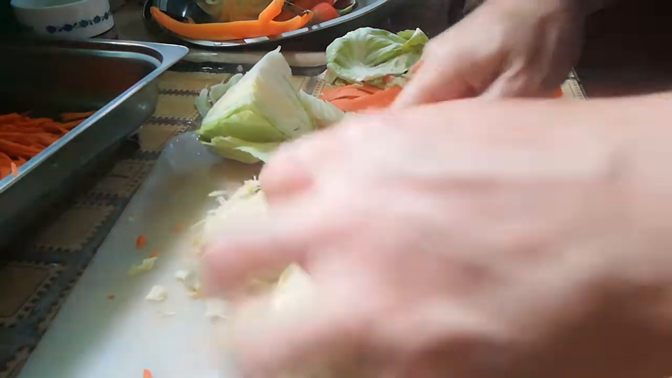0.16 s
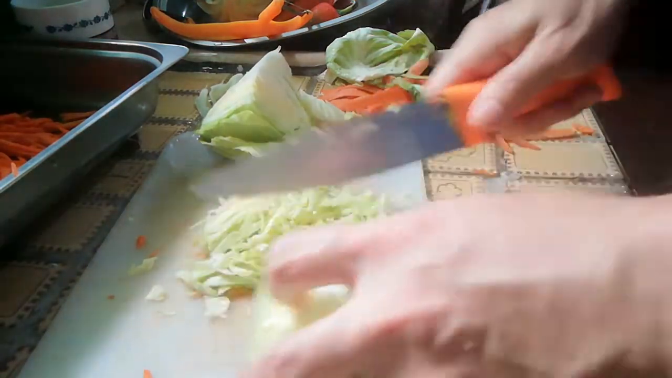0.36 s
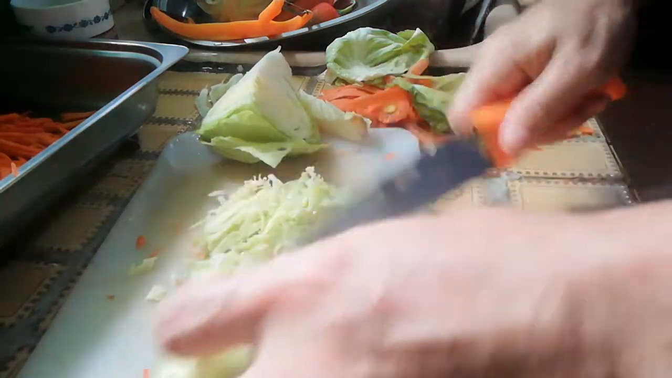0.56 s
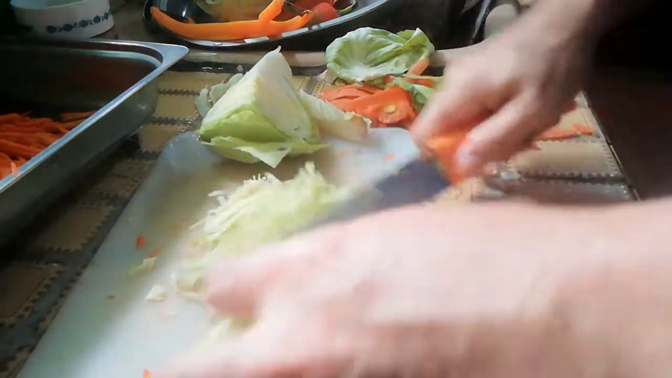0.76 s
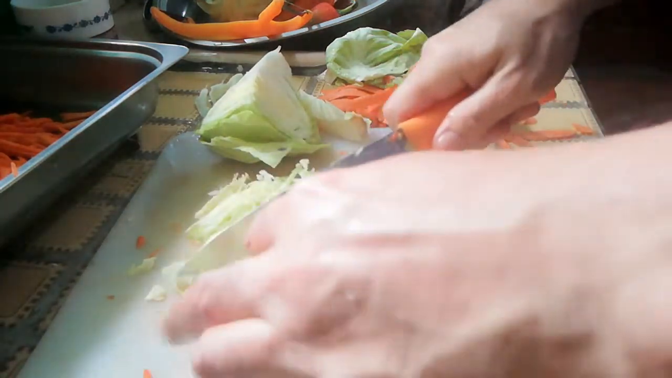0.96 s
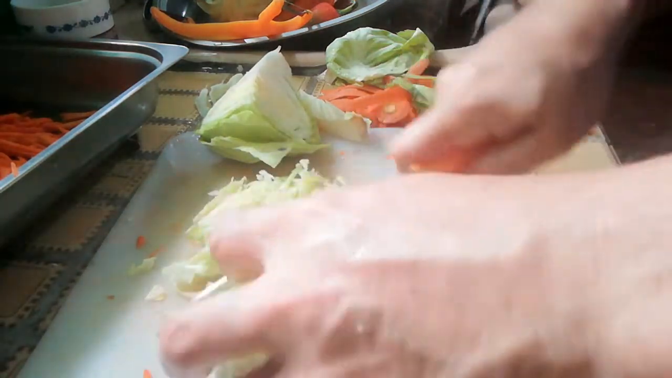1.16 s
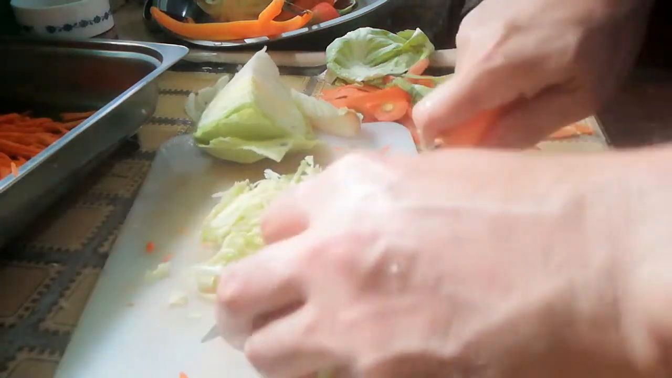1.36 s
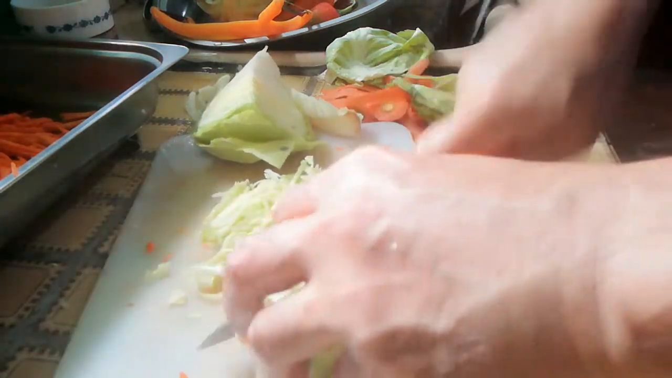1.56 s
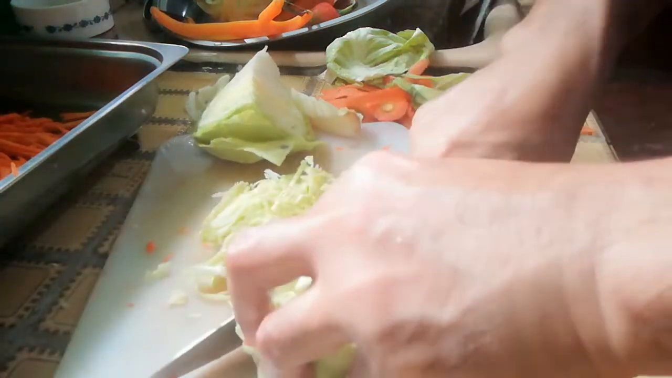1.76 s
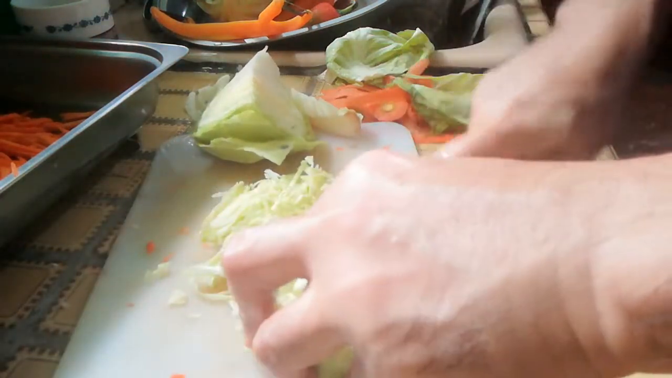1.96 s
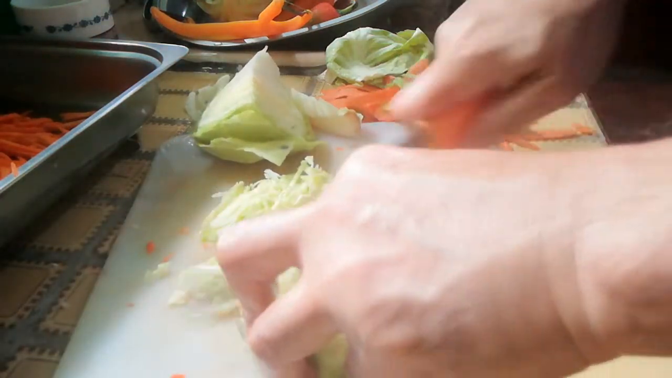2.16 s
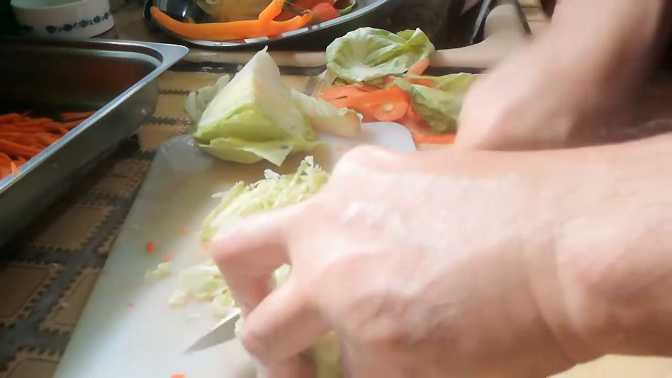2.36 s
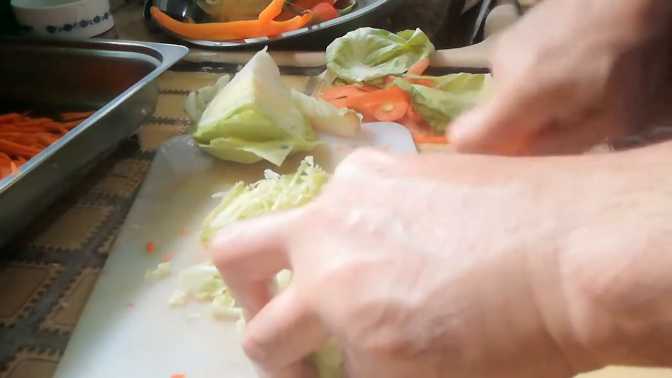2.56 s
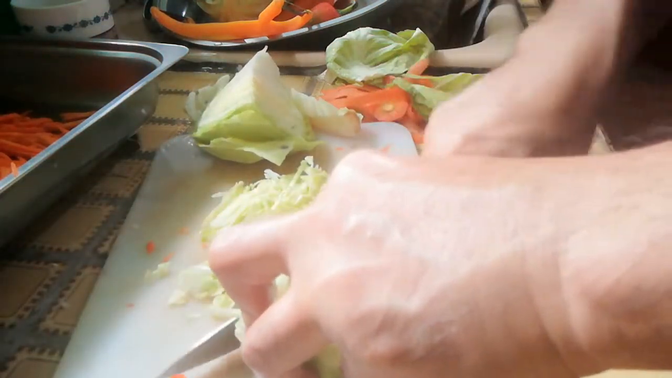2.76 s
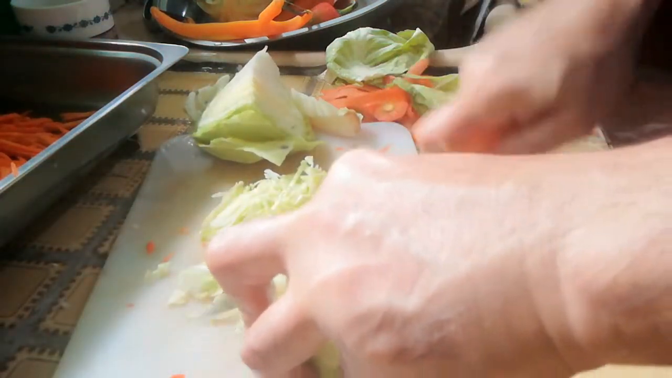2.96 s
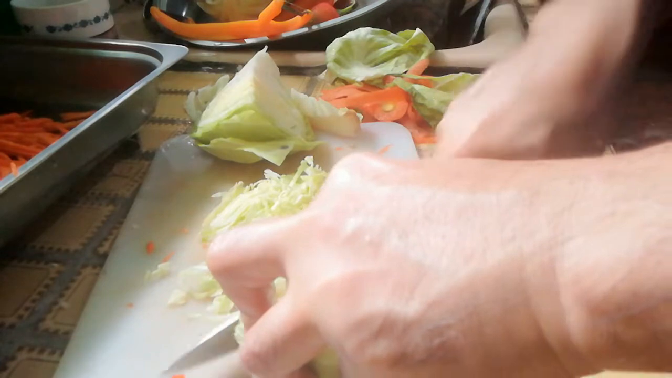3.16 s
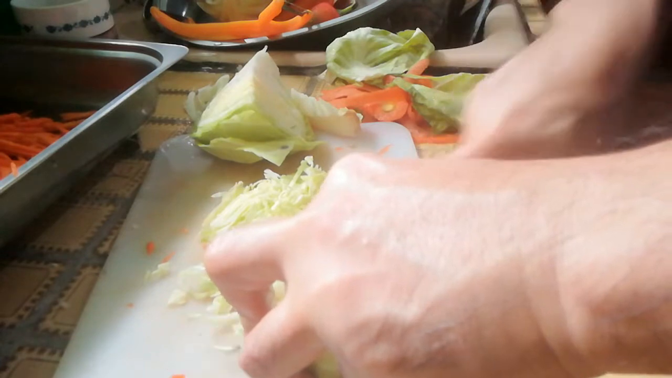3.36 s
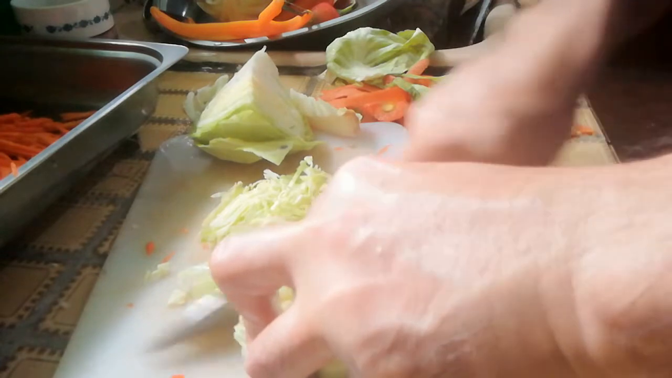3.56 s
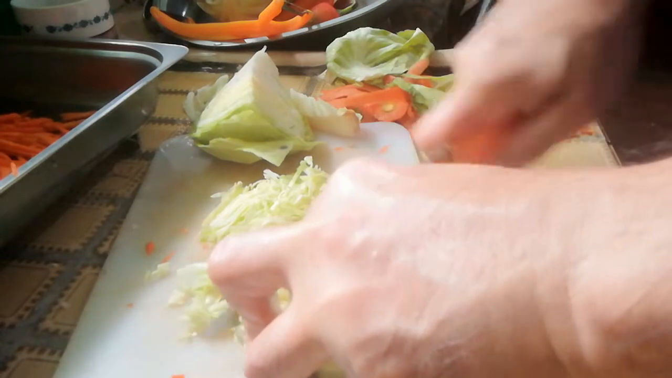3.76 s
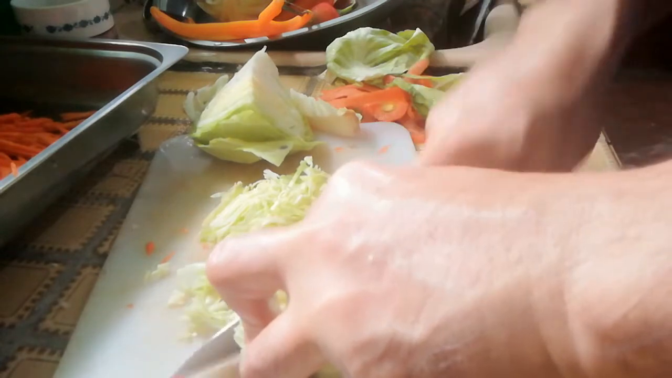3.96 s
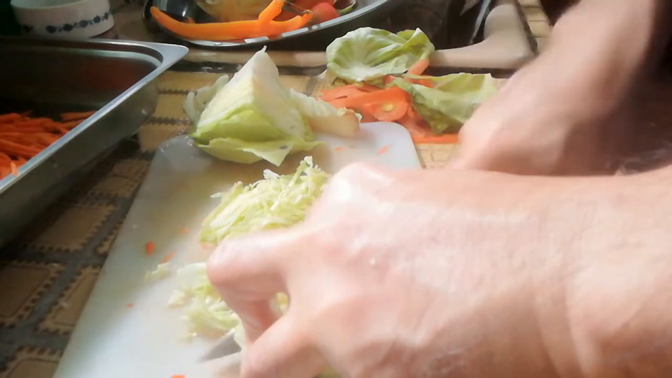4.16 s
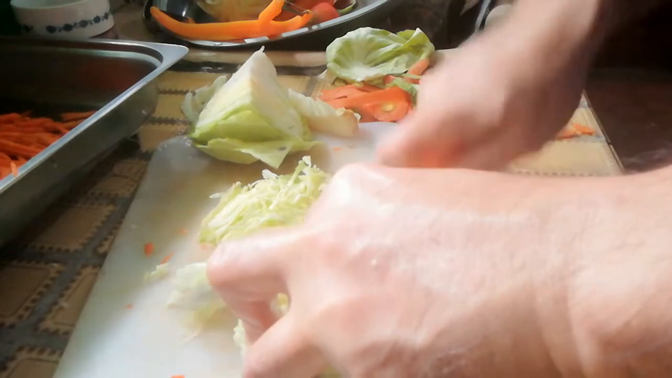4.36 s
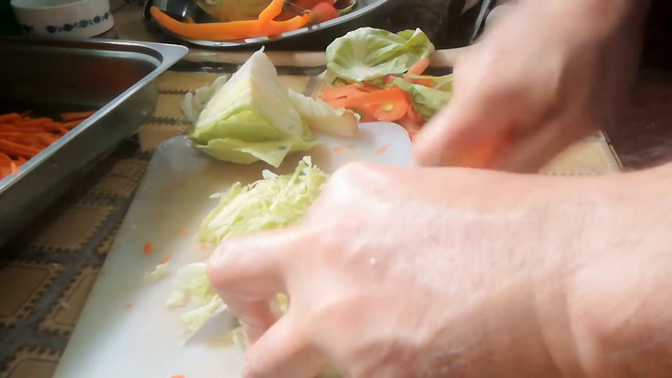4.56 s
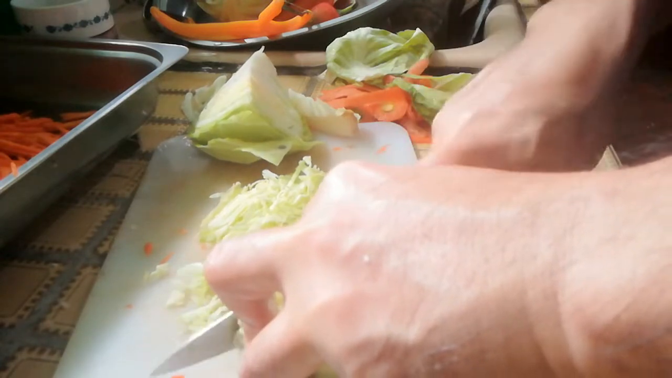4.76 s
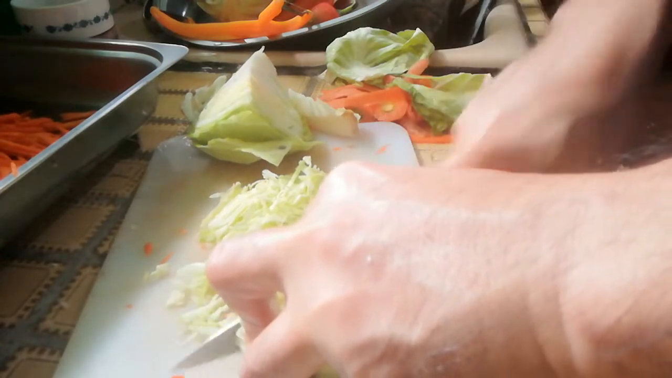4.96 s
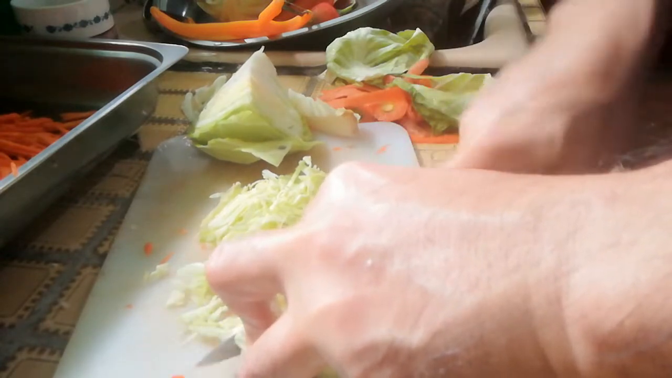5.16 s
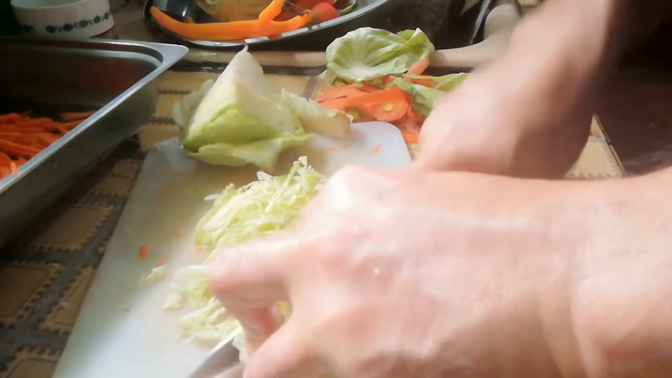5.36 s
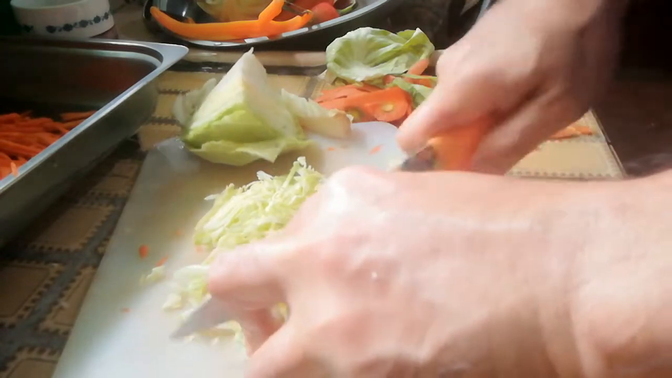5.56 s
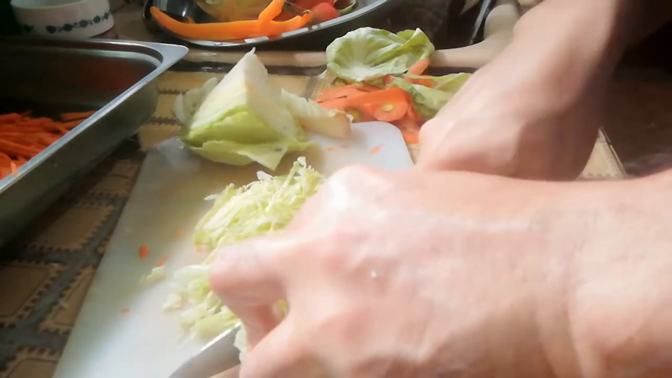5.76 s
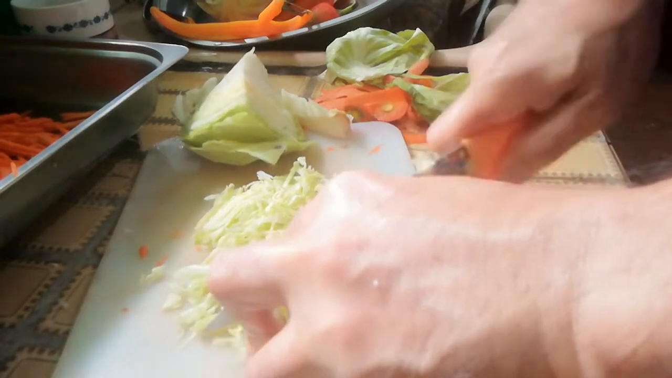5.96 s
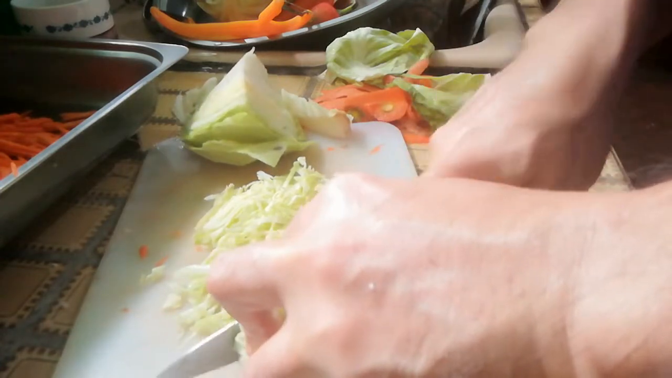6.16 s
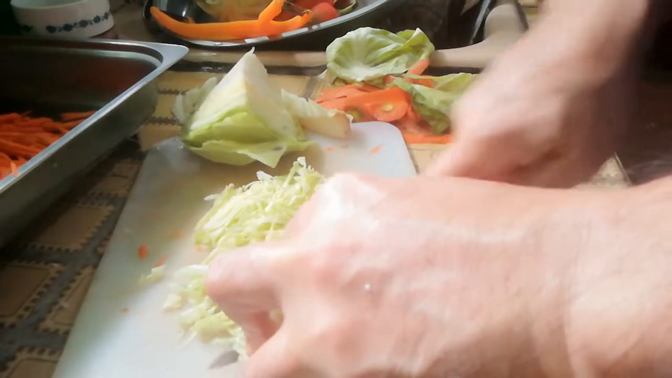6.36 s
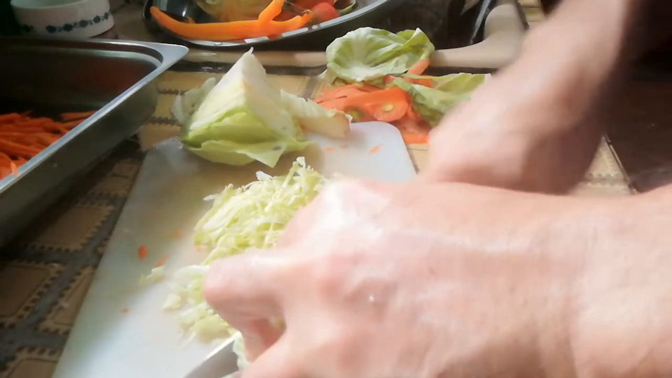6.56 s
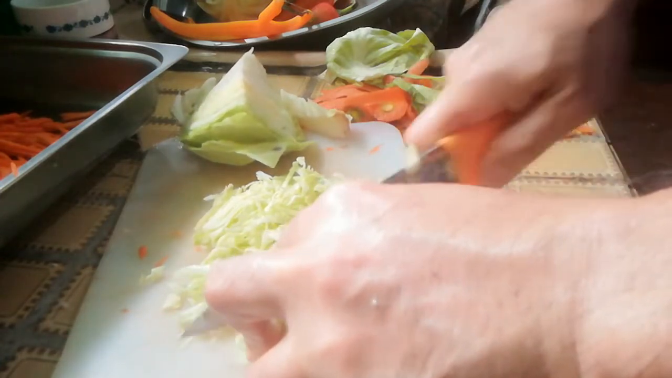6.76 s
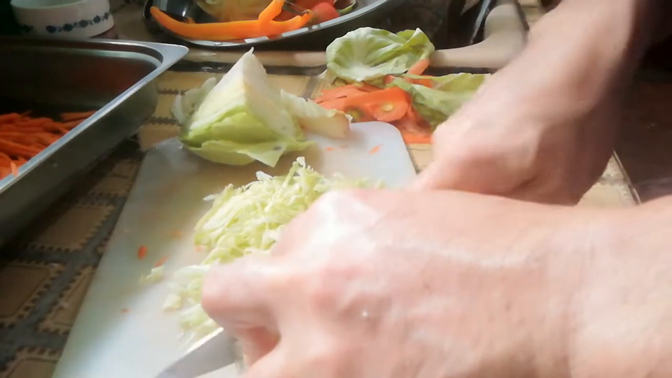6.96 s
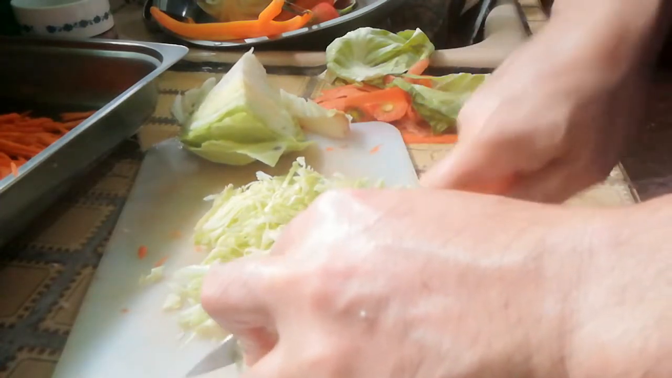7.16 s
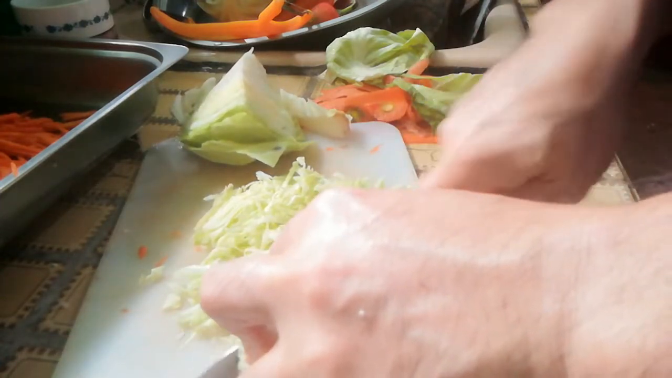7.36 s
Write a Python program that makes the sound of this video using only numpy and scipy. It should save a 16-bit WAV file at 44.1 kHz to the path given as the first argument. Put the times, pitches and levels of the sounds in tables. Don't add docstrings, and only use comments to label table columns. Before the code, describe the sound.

Close kitchen sound of cabbage being shredded: light leafy rustles, then quick crunchy cuts, bright snapping fibres and blade knocks above a quiet low hum.

```python
import sys
import numpy as np
from scipy import signal
from scipy.fft import rfft, irfft, next_fast_len
from scipy.io import wavfile
from scipy.ndimage import uniform_filter1d, map_coordinates

SR = 44100
rng = np.random.default_rng(int(sys.argv[2]) if len(sys.argv) > 2 else 0)


def gain_from_db(level_db):
    decades = np.asarray(level_db, float) / 20
    return 10 ** decades


def file_out(sig):
    cols = np.atleast_2d(sig).T
    lim = np.clip(cols, -1, 1)
    pcm = np.round(lim * 32767).astype(np.int16)
    wavfile.write(sys.argv[1], SR, pcm)


N = 326781

# (frequency [Hz], density [dB per Hz])
AIR_COLOUR = [(13, -38), (22, -12.5), (70, -4.5), (122, -9.5), (165, -7.5), (270, -9), (420, -15.5),
              (554, -9), (618, -17.5), (988, -10.5), (2520, -27), (7810, -22.5), (16000, -51)]
# (frequency [Hz], likeness [-1 to 1])
CAPSULE_LIKENESS = [(60, 0.91), (200, 0.9), (380, -0.16), (550, -0.4), (750, 0.26), (1100, -0.036),
                    (8000, -0.16)]
# (frequency [Hz], peak level [dB])
HUM_LINES = [(59.2, -77.5), (118.4, -65.5)]
# (time [s], level [dB])
PAN_RINGS = [
    (2.188, -59),
    (2.245, -64.5),
]

# (time [s], length [s], crisp level [dB], # crunch above
# crisp [dB])
RUSTLES = [(.315, 0.084, -55.5, -9.5), (0.587, 0.089, -61, -2), (0.676, 0.2, -56.5, -8),
           (0.941, 0.15, -61, -8), (1.099, 0.21, -56, -7.5), (1.27, 0.18, -54.5, -5.5),
           (1.469, 0.043, -45, -6.5), (1.69, 0.1, -53, -9.5), (1.788, .05, -54.5, -3),
           (1.846, 0.075, -52, -4), (2.055, 0.034, -46.5, -11), (2.15, 0.21, -61.5, -7.5),
           (2.488, .05, -56.5, -5.5), (2.58, 0.042, -47.5, -3), (2.789, 0.077, -54.5, -3.5),
           (3.023, 0.055, -62.5, -12), (3.259, 0.15, -49, -5.5), (3.468, 0.1, -55, -1),
           (3.71, 0.023, -62, -24), (3.758, .035, -53, -13), (3.984, 0.046, -53, -5),
           (4.219, 0.053, -58.5, -1), (4.483, 0.13, -63, -7), (4.799, 0.048, -54, -7.5),
           (5.13, 0.09, -53.5, -13), (5.28, 0.23, -53, -4.5), (6.022, 0.033, -54, -9), (6.36, .04, -65, -5),
           (6.527, 0.16, -51.5, -6), (6.83, 0.067, -54, -1),
           (2.74, 0.018, -53, -7),
    (5.625, .04, -60.5, -3),
    (5.8, 0.12, -62, 6),
    (7.1, 0.037, -73.5, 13),
    (7.3, 0.17, -59, -18),
    (6.79, 0.018, -67.5, 0),
    (5.59, 0.016, -70, -11),
    (2.5, 0.017, -50.5, -3.5),
]
# (time [s], length [s], crest position [share 0-1], crisp level [dB],
# crunch above crisp [dB])
SLICES = [(1.53, .11, 0.56, -37.5, -3), (2.3, 0.091, 0.4, -39, -5.5), (3.074, 0.13, 0.4, -37, -6.5),
          (3.794, 0.081, 0.66, -36, -7.5), (4.557, 0.19, .3, -41.5, -9.5), (4.935, 0.085, .55, -40, -6.5),
          (5.666, 0.09, 0.8, -38, -8.5), (6.046, 0.17, 0.21, -40, -8.5), (6.414, 0.061, 0.26, -40, -5),
          (6.858, .1, 0.44, -38.5, -8), (7.163, 0.092, 1, -38.5, -7)]
# (time [s], length [s], crisp level [dB], crunch above crisp [dB],
# depth above crisp [dB])
CHOPS = [
    (2.018, 0.016, -40, -2.5, -9),
    (2.627, .025, -36.5, -6, -4.5),
    (4.069, 0.044, -36, -4.5, -3.5),
    (5.189, 0.036, -36, -4.5, -5),
]
# (time [s], length [s], crisp level [dB],
# crunch above crisp [dB], depth above crisp [dB])
CORE_SPLITS = [
    (3.526, 0.038, -41.5, 4.8, 0),
    (4.314, 0.03, -39.5, 0.68, -4.5),
    (5.404, 0.024, -39.5, 5.4, -4),
    (6.607, .025, -47, 7.6, -3),
]

# (frequency [Hz], density [dB per Hz])
CRISP_COLOUR = [(2060, -14), (3500, -7.5), (4340, -2), (6010, -2.5), (7750, 1), (8210, -4), (10700, -18),
                (14600, -23.5), (16000, -26)]
CRUNCH_COLOUR = [(1200, -31), (1800, -8.5), (2200, -1.5), (3200, -2), (4200, -4.5), (5000, -11),
                 (7000, -35)]
DEPTH_COLOUR = [(100, -70), (200, -17), (450, -25.5), (800, -8.5), (1200, -1.5), (1800, -4), (2200, -22.5),
                (3200, -40)]

# (time [s], peak level [dB])
VEIN_TICKS = [(0.3277, -44), (0.4326, -43.5), (0.7444, -39), (0.764, -46), (0.7961, -43), (1.291, -39),
              (1.347, -42), (1.02, -46), (0.818, -36), (1.1129, -39), (1.3213, -33), (1.3704, -36),
              (1.3972, -28.5), (1.4686, -44), (1.4838, -33), (1.7007, -27), (1.73, -25.5),
              (1.7933, -29.5), (1.87, -31.5), (2.025, -26.5), (2.1604, -38), (2.1904, -33.5),
              (2.2147, -40), (2.25, -37),
              (2.9966, -43), (3.0222, -42), (3.052, -35), (3.072, -32), (3.091, -29), (3.702, -28),
               (3.764, -35), (3.7938, -42), (4.0564, -29), (4.2405, -29.5), (4.4834, -27.5), (4.5273, -34),
               (4.57, -33), (4.5875, -28), (4.6053, -29), (4.81, -34.5), (4.9232, -39), (4.9437, -38),
               (5.1402, -39), (5.166, -34), (5.1966, -30), (5.344, -23.5), (5.676, -26), (6.028, -39),
               (6.042, -34), (6.4297, -25), (6.8428, -45), (6.855, -30), (7.1729, -27), (7.364, -38)]
# (time [s], peak level [dB], pitch [Hz])
RIB_BREAKS = [(0.602, -33.5, 4600), (1.1602, -38.5, 1560), (1.2438, -34.5, 3240), (1.2735, -41, 5880),
              (2.0258, -25.5, 2050), (2.2727, -44, 1980), (2.312, -26, 4480), (2.583, -37, 5330),
              (2.588, -34, 3200), (2.636, -24, 1260), (4.4825, -34, 3400), (3.3164, -31, 3000),
              (1.4827, -28, 3000), (3.536, -21.5, 3180), (3.9905, -36, 1880), (4.0838, -24.5, 4350),
              (4.291, -37, 3360), (4.296, -29.5, 870), (4.324, -30, 3340), (5.4095, -17.5, 3240),
              (6.0093, -37.5, 4450), (6.421, -30, 4320), (6.468, -21, 1870), (6.575, -34, 1500),
              (6.5963, -27.5, 1180), (6.6168, -22.5, 2370), (6.7644, -38.5, 4440), (1.1112, -33, 2620),
              (6.874, -41, 5320), (7.1602, -45, 4300)]

# (time [s], peak level [dB], blade edge [dB], crack [dB], thud [dB])
TAPS = [(1.5912, -34, 0, -12, -35), (1.635, -29.5, -13, 3, -11), (2.6532, -14.5, -28, -15, -31.5),
        (3.193, -42, -31, 22.5, -31), (4.1065, -7, -12.5, -32, -32.5), (5.2208, -10.5, -12.5, -11, -40),
        (5.7652, -11.5, 0, -5, -60), (6.165, -25, -22, -12, -42), (6.2277, -41, -14, 12, -30),
        (6.4715, -16.5, -16, -8, -38), (7.2554, -15.5, -18, -4.5, -49)]
# (frequency [Hz], level [dB], decay t60 [s])
BOARD_MODES = [(1827, -9.5, 0.017), (1390, -12.5, 0.015), (2050, -4, 0.004)]
BLADE_MODES = [(2210, 3.5, 0.0031), (2620, -4, 0.0058), (3170, -16, 0.015)]

# (frequency [Hz], decay t60 [s])
WALL_DECAY = [(300, 0.41), (2000, 0.3), (5000, 0.19), (12000, 0.22)]
# (frequency [Hz], left minus right [dB])
LEFT_LEAN = [(300, 0.5), (700, -1.5), (1400, 2.5), (2800, 0), (5500, 3), (9000, 6), (14000, 0)]

EDGE_S, EDGE_DB = 0.021, 22.5
SLICE = dict(entry_db=(8.5, 10.5, 13.5), sag_db=(4, 2, 0.5), release_s=0.014,
             drop_db=(8.5, 11.5, 12.5), settle_db_per_s=(124, 113, 98))
CHOP = dict(entry_db=(10, 12, 13), sag_db=(2, 1.5, 1), release_s=0.018,
            drop_db=(14, 17, 14.5), settle_db_per_s=(201, 177, 203))
RUSTLE = dict(entry_db=(4, 6, 7), sag_db=(5.5, 4.5, 11), release_s=0.012,
              drop_db=(10.5, 14.5, 5), settle_db_per_s=(250, 250, 250))
SLICE_DEPTH_DB, RUSTLE_DEPTH_DB = -2, -4
CHOP_CREST, SPLIT_CREST, RUSTLE_CREST = 0.93, 0.27, 0.44
REST_DB = -77.5
RIB = dict(note=0.72, rise_s=0.0012, t60=0.017, sharp=1, ragged_db=1.5)
VEIN = dict(note=0.35, rise_s=0.001, t60=0.035, sharp=0.9, ragged_db=4)
VEIN_HZ, VEIN_SCATTER = 7050, 0.04
CAPSULE_LAG, CROSS_LAG = 4, 26
TOP_HZ = 15830


def unit(x):
    return x / np.sqrt(np.mean(x ** 2) + 1e-20)


def along(points, hz):
    f, v = np.transpose(points)
    return np.interp(np.log(hz + 1), np.log(f + 1), v)


def wobble(rate):
    knots = rng.standard_normal(int(N * rate / SR) + 4)
    return map_coordinates(knots, [np.arange(N) * rate / SR])


def filtered(x, response):
    m = next_fast_len(N + SR // 2)
    return irfft(rfft(x, m) * response(np.fft.rfftfreq(m, 1 / SR)), m)[..., :N]


def patchy(x, depth_db, size):
    z = signal.stft(x, nperseg=size)[2]
    field = uniform_filter1d(rng.standard_normal(z.shape[1:]), size=4, axis=0)
    field = uniform_filter1d(field, size=5, axis=1)
    return signal.istft(z * gain_from_db(depth_db * unit(field)), nperseg=size)[1][:, :N]


def kitchen():
    t = np.arange(N) / SR
    pair = patchy(rng.standard_normal((2, N)), depth_db=2.2, size=2048)

    def mid_and_side(hz):
        turn = np.arccos(np.clip(along(CAPSULE_LIKENESS, hz), -1, 1)) / 2
        return gain_from_db(along(AIR_COLOUR, hz)) * [np.cos(turn), np.sin(turn)]

    mid, side = filtered(pair, mid_and_side)
    air = gain_from_db(-65 + 0.64 * wobble(3.384)) * unit(np.array([mid + side, mid - side]))
    tones = 0
    for hz, db in HUM_LINES:
        cycles = hz * t + np.cumsum(3.52 * wobble(12)) / SR
        tones = tones + gain_from_db(db + 1.7 * wobble(22)) * np.sin(2 * np.pi * cycles)
    for (s, db), hz in zip(PAN_RINGS, (249, 182)):
        age = np.maximum(t - s, 0)
        swell = age / 0.05 * np.exp(1 - age / 0.05)
        cycles = hz * age * (1.03 - 0.15 * age)
        tones = tones + gain_from_db(db + 2.5 * wobble(30)) * swell * np.sin(2 * np.pi * cycles)
    return air + tones


def effort(s, length, crest, levels_db, entry_db, sag_db, release_s, drop_db, settle_db_per_s):
    steps_s = [-EDGE_S, EDGE_S, crest * length, (1 - crest) * length + 1e-4, release_s, 1]
    knots = s + np.cumsum(steps_s)
    end = np.add(sag_db, drop_db)
    below = np.array([np.add(entry_db, EDGE_DB), entry_db, 0 * end, sag_db, end, end + settle_db_per_s])
    t = np.arange(0, N, 32) / SR
    curves = [db + np.interp(t, knots, -column, left=-99) for db, column in zip(levels_db, below.T)]
    return gain_from_db(2 * np.array(curves))


def strokes():
    power = gain_from_db(2 * REST_DB)
    for s, length, db, crunch in RUSTLES:
        levels = (db, db + crunch, db + crunch + RUSTLE_DEPTH_DB)
        power = power + effort(s, length, RUSTLE_CREST, levels, **RUSTLE)
    for s, length, crest, db, crunch in SLICES:
        levels = (db, db + crunch, db + crunch + SLICE_DEPTH_DB)
        power = power + effort(s, length, np.clip(crest, 0, 1), levels, **SLICE)
    for cuts, crest in [(CHOPS, CHOP_CREST), (CORE_SPLITS, SPLIT_CREST)]:
        for s, length, db, crunch, depth in cuts:
            power = power + effort(s, length, crest, (db, db + crunch, db + depth), **CHOP)
    return uniform_filter1d(np.repeat(np.sqrt(power), 32, axis=1), size=100)[:, :N]


def bursts(count, lo_hz, hi_hz, cycles, spread_db, size):
    when, pitch, big, spot = rng.random((count, 4)).T
    hz = lo_hz * (hi_hz / lo_hz) ** pitch
    turns = hz[:, None] * np.arange(size) / SR
    gain = hz * gain_from_db(-spread_db * np.log(big + 1e-4))
    shapes = gain[:, None] * np.sin(2 * np.pi * turns) * np.exp(-turns / cycles)
    start = (when * N).astype(int) + (spot * 6).astype(int) * (N + size)
    index = start[:, None] + np.arange(size)
    row = np.bincount(index.ravel(), shapes.ravel(), 6 * (N + size))
    return row.reshape(-1, N + size)[:, :N]


def leaves():
    clump = 1.7 * wobble(90)
    fizz = bursts(count=60000, lo_hz=3000, hi_hz=16860, cycles=4.7, spread_db=1.0, size=40)
    crunch = bursts(count=24000, lo_hz=1644, hi_hz=6000, cycles=1.93, spread_db=3.0, size=90)
    give = bursts(count=12000, lo_hz=194, hi_hz=2690, cycles=1.97, spread_db=1.63, size=260)
    layers = [(fizz, CRISP_COLOUR, 2.1), (crunch, CRUNCH_COLOUR, 3.76), (give, DEPTH_COLOUR, 0.6)]
    out = 0
    for (cells, colour, extra_db), gain in zip(layers, strokes()):
        cells = filtered(cells, lambda hz: gain_from_db(along(colour, hz)))
        level = gain * gain_from_db(extra_db + clump + 0.23 * wobble(120))
        out = out + cells / np.std(cells.sum(0)) * level
    return out


def fibres():
    cracks = bursts(count=2500, lo_hz=4000, hi_hz=8900, cycles=0.84, spread_db=3, size=30)
    cracks = filtered(cracks, lambda hz: gain_from_db(along(CRISP_COLOUR, hz) / 2))
    return gain_from_db(-7) * strokes()[0] * cracks / np.std(cracks.sum(0))


def thin(hz):
    radiation = (1j * hz / (900 + 1j * hz)) ** 3
    return radiation / (1 - (hz / 8300) ** 2 + 0.8j * hz / 8300) ** 4


def snap(hz, t, note, rise_s, t60, sharp, ragged_db):
    ragged = np.repeat(rng.standard_normal(len(t) // 40), 40)
    spray = rng.standard_normal(len(t)) * gain_from_db(ragged_db * ragged)
    click = 0.7 * spray * gain_from_db(-60 * t / 0.003)
    tone = note * np.sin(2 * np.pi * hz * t) * gain_from_db(-60 * t * hz / 30)
    hiss = unit(signal.lfilter(*signal.iirpeak(hz, max(sharp, 0.3), SR), spray))
    return click + tone + 0.55 * hiss * gain_from_db(-60 * t / t60) * (1 - np.exp(-t / rise_s))


def ribs():
    out, t = np.zeros((6, N + 2000)), np.arange(2000) / SR
    breaks = [(s, db, hz, RIB) for s, db, hz in RIB_BREAKS]
    for s, db in VEIN_TICKS:
        hz = VEIN_HZ * np.exp(VEIN_SCATTER * rng.standard_normal())
        breaks.append((s, db - 5, hz, VEIN))
    for k, (s, db, hz, kind) in enumerate(breaks):
        out[k % 6, round(s * SR):][:len(t)] += gain_from_db(db - 3) * snap(hz, t, **kind)
    return filtered(out[:, :N], thin)


def modes(table, t):
    out = 0
    for hz, db, t60 in table:
        out = out + gain_from_db(db + rng.normal(0, 1.5) - 60 * t / t60) * np.sin(2 * np.pi * hz * t)
    return out


def board():
    out, low, t = np.zeros(N + 6000), np.zeros(N + 6000), np.arange(6000) / SR
    rise = 1 - np.exp(-t / 0.0003)
    thump = (1 - np.exp(-t / 0.011)) * np.sin(2 * np.pi * 175 * t)
    push = t / 0.0015 * np.exp(1 - t / 0.002)
    for s, db, edge_db, crack_db, thud_db in TAPS:
        hit = slice(round(s * SR), round(s * SR) + len(t))
        rough_phase = 2 * np.pi * 7600 * t + 1.5 * rng.standard_normal(len(t))
        crack = gain_from_db(crack_db + 3 - 60 * t / 0.008) * np.sin(rough_phase)
        ring = modes(BOARD_MODES, t) + gain_from_db(edge_db + 6.5) * modes(BLADE_MODES, t)
        out[hit] += gain_from_db(db - 3.5) * rise * (ring + crack)
        low[hit] += gain_from_db(db + thud_db + 1.5 - 60 * t / 0.052) * thump
        low[hit] += gain_from_db(db + edge_db - 40) * push
    return filtered(out[None, :N], thin), low[:N]


def placed(spots, scatter_db, t60):
    t = np.arange(600) / SR
    paths = gain_from_db(scatter_db - 60 * t / t60) * rng.standard_normal((len(spots), 2, len(t)))
    paths[:, 0, CAPSULE_LAG] += 1
    paths[:, 1, 0] += 1
    paths /= np.linalg.norm(paths, axis=2, keepdims=True)
    return signal.fftconvolve(spots[:, None], paths, axes=2)[..., :N].sum(0)


def walls(x):
    hz, t, z = signal.stft(rng.standard_normal((2, SR // 2)), SR, nperseg=256)
    decay = gain_from_db(-60 * t / along(WALL_DECAY, hz)[:, None])
    tail = signal.istft(z * decay, SR, nperseg=256)[1]
    late = np.pad(x, (260, 0))[None]
    return signal.fftconvolve(late, tail / np.linalg.norm(tail[0]), axes=1)[:, :N]


def scene():
    shreds = patchy(leaves(), depth_db=1.5, size=256)
    snaps = fibres() + ribs()
    taps, thuds = board()
    near = placed(shreds, scatter_db=-15, t60=0.029)
    near = near + placed(snaps, scatter_db=-21, t60=0.008)
    near = near + placed(taps, scatter_db=-24, t60=0.007)
    wet = gain_from_db(-8.5) * walls(shreds.sum(0) + snaps.sum(0)) + gain_from_db(-9) * walls(taps[0])

    def lean(hz):
        return (hz > 110) * gain_from_db(np.outer([0.5, -0.5], along(LEFT_LEAN, hz)))

    return filtered(near + wet, lean) + thuds + kitchen()


def band_limit(x):
    return signal.sosfilt(signal.butter(12, 16470, fs=SR, output="sos"), x)


def record(dry):
    late = np.pad(dry[::-1], ((0, 0), (CROSS_LAG, 0)))[:, :N]
    late = 0.3 * filtered(late, lambda hz: 1 / (1 + (hz / 4000) ** 2))
    hiss = gain_from_db(-83) * rng.standard_normal(dry.shape)
    mix = filtered(dry + late + hiss, lambda hz: hz < TOP_HZ)
    return band_limit(mix)


dry = scene()
out = record(dry)
file_out(out)
```